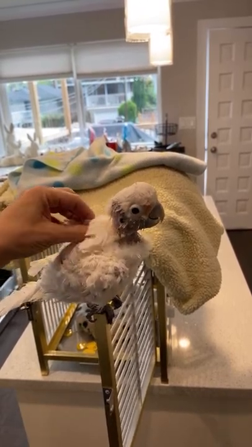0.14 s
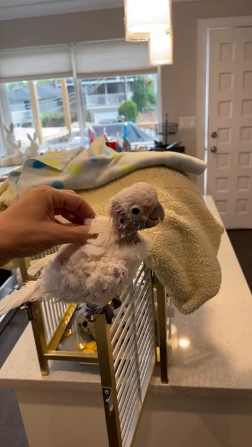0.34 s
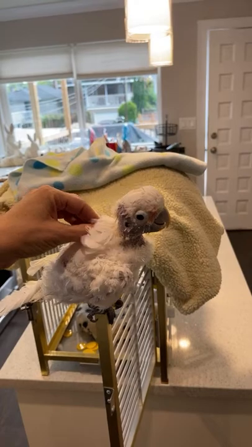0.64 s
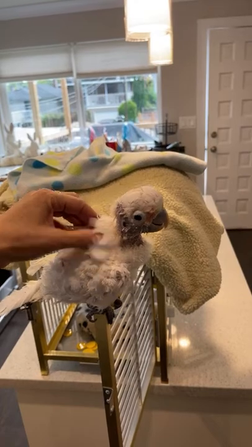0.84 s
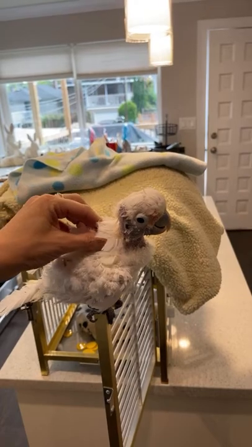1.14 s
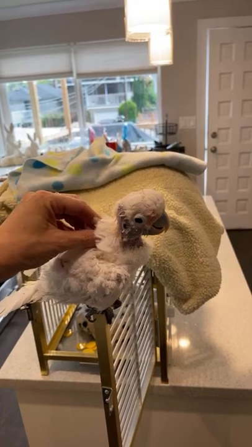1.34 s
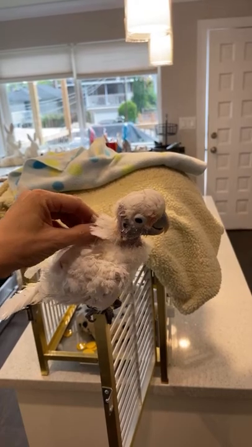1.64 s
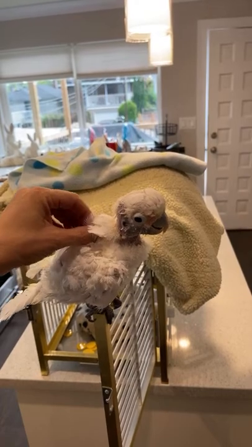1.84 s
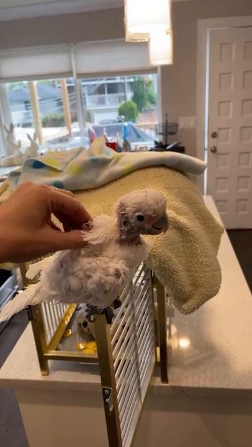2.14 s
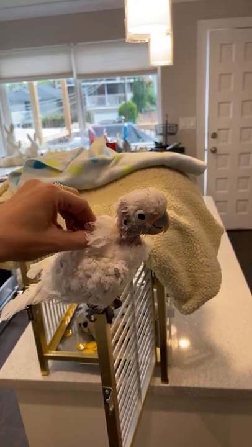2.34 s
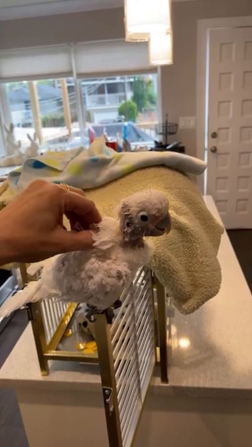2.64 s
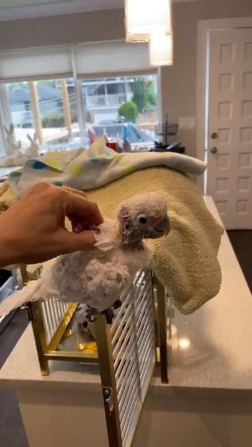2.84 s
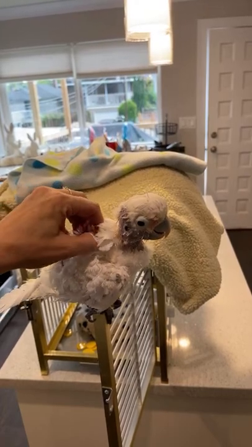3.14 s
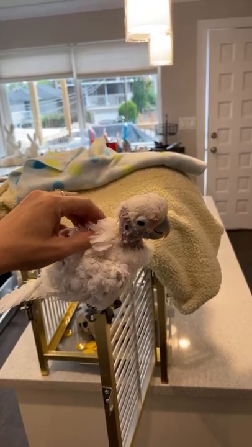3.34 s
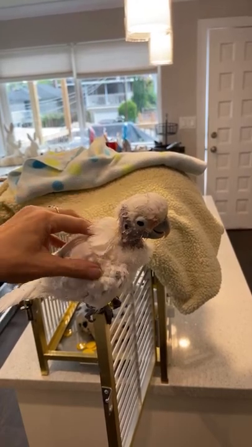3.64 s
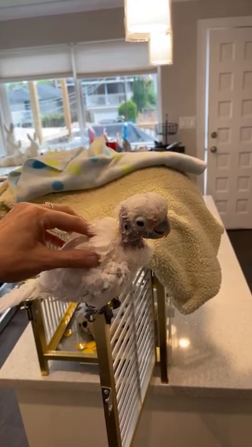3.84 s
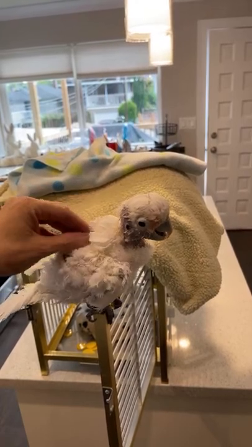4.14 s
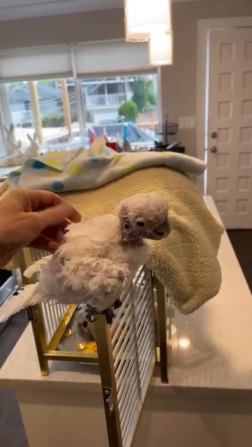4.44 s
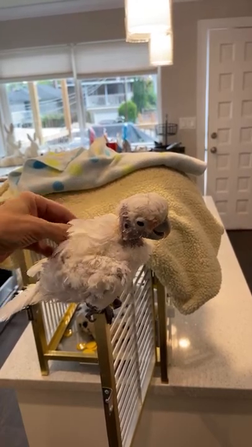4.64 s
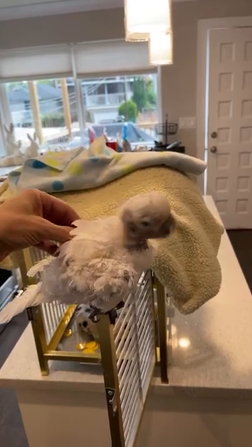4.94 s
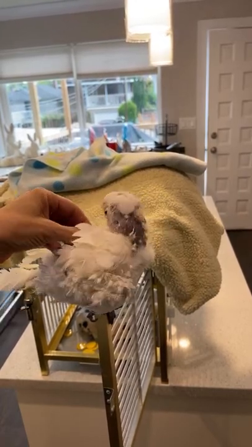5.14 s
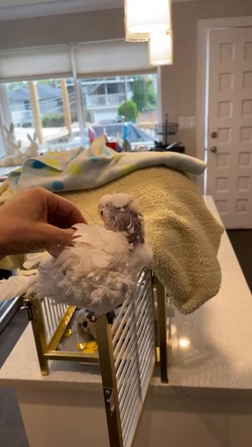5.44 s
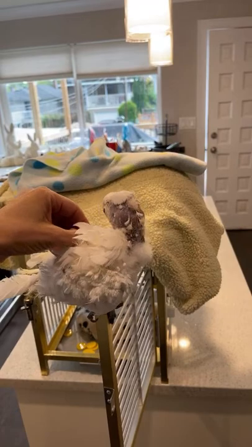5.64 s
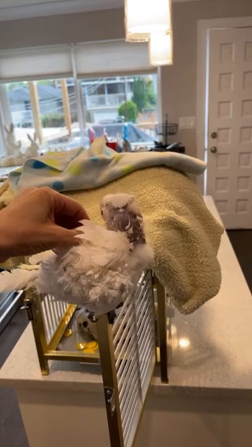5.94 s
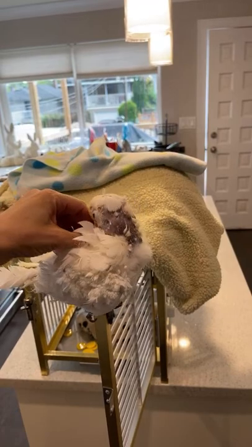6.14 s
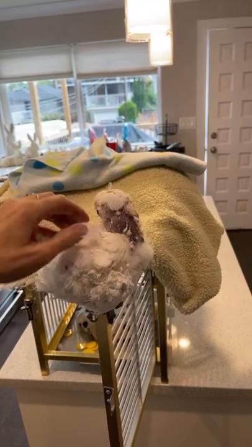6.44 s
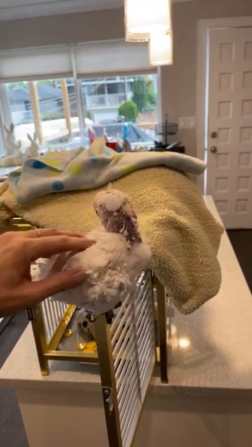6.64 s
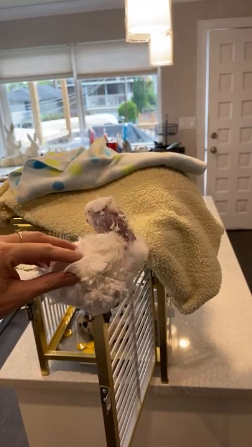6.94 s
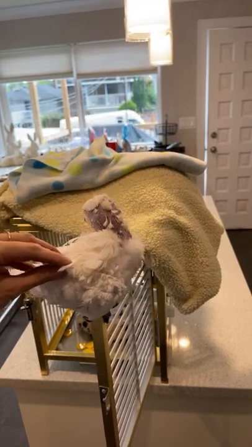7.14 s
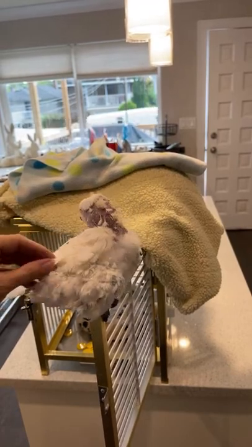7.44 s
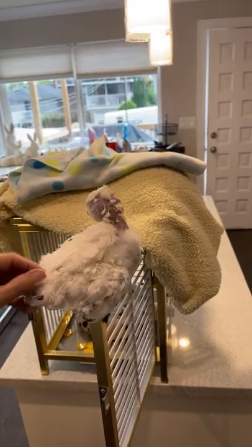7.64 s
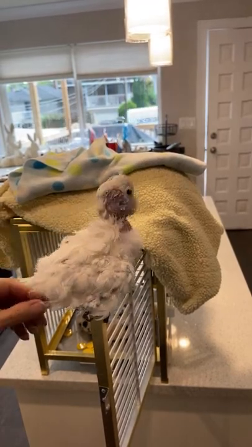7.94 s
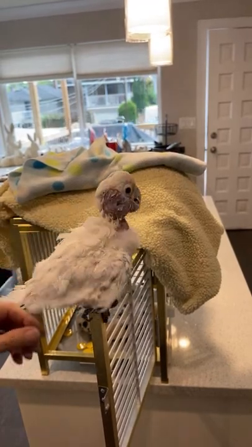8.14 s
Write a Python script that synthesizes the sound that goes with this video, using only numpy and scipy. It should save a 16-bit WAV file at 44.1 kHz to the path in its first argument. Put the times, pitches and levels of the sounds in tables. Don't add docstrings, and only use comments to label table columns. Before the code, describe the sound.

A parrot calls in a lively, hard-walled room; the echo is stronger than the direct sound, and low motor rumble, airy hiss and faint steady hum continue throughout. At 0 s the tail of a short whistle meets a raspy squawk. A barely audible distant cheep comes at 0.6 s, and the rumble briefly surges around 1 s. Two harsh squawks follow at 1.1-1.4 s, then a squawk with a shrill whistle at 1.55 s. At 1.9 s a hoot rises, hoarse then clear, for a third of a second. A pause holds only hum and a very faint brush at 2.8 s. Squawk pairs sound at 3.3, 3.9 and 4.9 s, with high whistles at 3.55-3.8 s; a squawk and long piercing whistle come at 5.5 s. A second rising hoot at 5.8 s, whistles at 6.6-6.9 s, and last squawks at 7-7.3 s. Dry feathers softly crackle at 7.7-8.2 s.

```python
import sys
import numpy as np
from scipy import signal
from scipy.fft import rfft, irfft, next_fast_len
from scipy.io import wavfile
from scipy.ndimage import uniform_filter1d, map_coordinates

SR = 44100
rng = np.random.default_rng(int(sys.argv[2]) if len(sys.argv) > 2 else 0)


def nominal_scale(level):
    x = np.asarray(level, float) / 20
    return 10 ** x


def transcribe(u):
    v = np.clip(np.atleast_2d(u).T, -1, 1)
    q = np.round(v * 32767).astype(np.int16)
    wavfile.write(sys.argv[1], SR, q)


N = 365443
T = np.arange(N) / SR

# [hz, level_db]
HUM_TONES = [(592.2, -75.5), (662.1, -62.5), (775.2, -61.5), (1184, -67), (1265, -68), (3553, -74)]
# [hz, db_per_hz]
MOTOR_SPECTRUM = [(18, -55), (30, -36), (92, 3), (208, -17)]
# [hz, db_per_hz]
AIR_SPECTRUM = [(140, -7), (208, -12), (620, -15.5), (1770, -25.5), (3600, -32.5), (6200, -44.5),
                (7500, -53.5), (15600, -69.5)]
# [start_s, length_s, level_db, pitch_hz, roughness_0_1]
SQUAWKS = [(-.1, 0.12, -43, 485, 0.89), (.055, 0.19, -23.5, 499.4, 0.86), (1.062, 0.21, -21, 500, 0.97),
           (1.25, 0.14, -21, 530, 0.8), (1.535, 0.11, -27.5, 447.2, 0.85),
           (3.325, 0.17, -20.5, 519.3, 0.89), (3.495, .15, -20.5, 540, .75), (3.9, 0.16, -22.5, 500, 0.71),
           (4.075, 0.15, -23.5, 514.5, .4), (4.94, .21, -21, 522, 0.72), (5.145, 0.1, -19.5, 526.7, 0.38),
           (5.455, 0.13, -19, 500, 0.72), (7.012, 0.14, -19, 480.8, 0.91), (7.195, 0.12, -20.5, 500, .3)]
# [centre_hz, width_hz, level_db]
SQUAWK_THROAT = [
    [(946, 220, -15), (1204, 440, -1.5), (1543, 3000, -5), (2400, 400, -2.5), (3055, 510, -1)],
    [(3590, 2400, 6), (4570, 560, 14.5), (5200, 320, -8)],
    [(5866, 1100, 6), (7260, 800, -15.5), (8150, 460, 1), (9600, 1200, -14), (12000, 6000, -10.5),
     (13300, 1100, -21.5), (16000, 1100, -15)],
]
# [centre_hz, width_hz, level_db]
CROP_MODES = [(740, 260, 0)]
# [start_s, length_s, level_db, pitch_hz, octave_db]
OPENING_WHISTLE = [
    (-0.012, 0.047, -18, 1905, -32),
]
# [start_s, length_s, level_db, pitch_hz, octave_db]
HIGH_WHISTLES = [
    (1.555, 0.15, -16.5, 3400, -26.5),
    (3.55, 0.14, -22, 3528, -15),
    (3.67, .08, -22, 3788, -30),
    (3.73, 0.078, -23.5, 3204, -19),
    (5.54, .18, -17.5, 3447, -23),
    (6.62, .165, -18.5, 3407, -18.5),
    (6.81, .1, -32, 3163, -24.5),
]
# [start_s, length_s, level_db, pitch_hz, octave_db]
LOW_WHISTLES = [
    (1.515, 0.13, -27.5, 2270, -7),
    (6.585, .13, -32.5, 2376, -4),
    (6.81, 0.057, -39.5, 2400, -6.5),
]
# [start_s, length_s, level_db, pitch_hz]
CHEEPS = [
    (.59, .4, -75, 3070),
    (2.55, 0.19, -77.5, 8260),
]
# [time_s, pitch_hz, level_db, beak_opening_db]
HOOTS = [
    [(1.865, 343.5, -41.5, -15), (1.905, 372.1, -21.5, -20), (1.97, 441.6, -20.5, -1),
     (2.046, 484.6, -18.5, 5.5), (2.09, 514.3, -16.5, -11.5), (2.14, 507.1, -19.5, -3.5),
     (2.2, 513.2, -26.5, -1)],
    [(5.775, 348, -42, -35), (5.82, 392.5, -24, -21), (5.87, 422.8, -22, -6), (5.93, 457.2, -20, 1),
     (6.02, 488.6, -20.5, -4.5), (6.075, 497.4, -19.5, -5), (6.115, 509, -36, -6.5)],
]
# [centre_hz, width_hz, level_db]
HOOT_THROAT = [
    [(400, 350, -20), (1000, 550, -7), (1450, 600, 0)],
    [(2450, 500, -13), (2950, 450, -7), (3450, 550, 0), (4300, 800, -1), (4800, 450, -5)],
    [(7050, 600, 0), (8700, 600, -4), (10700, 900, -2), (12800, 700, -7), (14600, 700, -15)],
]
# [hz, t60_s]
ROOM_DECAY = [(400, .4), (1500, .45), (4000, .42), (9000, .35), (15000, .25)]
# [middle_s, half_width_s, level_db]
FEATHER_STROKES = [
    (2.78, 0.11, -80),
    (7.768, .06, -66),
    (7.94, .025, -57),
    (8.02, .05, -70),
    (8.135, .012, -72),
    (8.185, 0.0112, -76),
]
# [hz, db_per_hz]
FEATHER_SPECTRUM = [(880, -41), (1500, -11), (1670, -20), (1820, 2.5), (4230, 5.5), (4760, 7.5),
                    (15600, -7.5)]

SQUAWK_SHAPE = dict(attack_s=.085, rise_db=40, swell_db=5, fade_db=250, scoop=.2, glide_s=.07, sag=.01)
OPENING_SHAPE = dict(attack_s=.012, rise_db=30.5, swell_db=-27, fade_db=172, scoop=0, glide_s=.03, sag=.023)
CHEEP_SHAPE = dict(attack_s=.02, rise_db=15, swell_db=5, fade_db=500, scoop=0, glide_s=.03, sag=0)
HIGH_SHAPE = dict(attack_s=.045, rise_db=25, swell_db=-8, fade_db=400, scoop=.08, glide_s=.03, sag=.75)
LOW_SHAPE = dict(attack_s=.03, rise_db=30, swell_db=-80, fade_db=400, scoop=.25, glide_s=.022, sag=.01)


def unit(x):
    return x / np.sqrt(np.mean(x ** 2) + 1e-20)


def along(points, hz):
    f, v = np.transpose(points)
    return np.interp(np.log(hz + 1), np.log(f + 1), v)


def wobble(rate_hz):
    t = T[::3]
    knots = rng.standard_normal(int(N * rate_hz / SR) + 4)
    return np.interp(T, t, map_coordinates(knots, [t * rate_hz]))


def filtered(x, response):
    m = next_fast_len(N + 8192)
    return irfft(rfft(x, m) * response(np.fft.rfftfreq(m, 1 / SR)), m)[:N]


def house():
    surge_db = 7.5 * np.exp(-((T - 1.03) / .083) ** 2)
    rumble_db = -56.5 + .8 * wobble(1.1) + surge_db
    rumble = filtered(rng.standard_normal(N), lambda f: nominal_scale(along(MOTOR_SPECTRUM, f)) * (f < 140))
    air = filtered(rng.standard_normal(N), lambda f: nominal_scale(along(AIR_SPECTRUM, f)) * (f >= 140))
    air = unit(air) * nominal_scale(.7 * wobble(6))
    tones = np.zeros(N)
    for hz, level_db in HUM_TONES:
        tones += nominal_scale(level_db + 2.5 * wobble(4)) * np.sin(2 * np.pi * hz * T + .7 * wobble(12))
    hiss = nominal_scale(-94.5) * rng.standard_normal(N)
    return nominal_scale(rumble_db) * unit(rumble) + nominal_scale(-54.5) * air + nominal_scale(-1.5) * tones + hiss


def note_curves(rows, attack_s, rise_db, swell_db, fade_db, scoop, glide_s, sag):
    breath_gap_s = .1
    start, length, level_db, hz, *more = np.transpose(rows)
    t = T[::40]
    age = t - start[:, None]
    effort_db = -rise_db * np.clip(1 - age / attack_s, 0, 3) ** 2
    effort_db = effort_db - fade_db * np.maximum(age - length[:, None], 0)
    held_s = np.clip(age, 0, length[:, None]) - length[:, None] / 2
    gain = nominal_scale(level_db[:, None] + effort_db + swell_db * held_s)
    now = np.argmax(gain, axis=0)
    fresh = np.append(True, start[1:] - (start + length)[:-1] > breath_gap_s)
    breath_start = np.maximum.accumulate(np.where(fresh, start, -1))
    since_s = np.maximum(t - breath_start[now], 0)
    sag_share = sag * np.clip(t - start[now], 0, length[now])
    pitch = hz[now] * (1 - scoop * np.exp(-since_s / glide_s) - sag_share)
    smooth = [uniform_filter1d(v, size=15) for v in [pitch] + [c[now] for c in more]]
    return [np.interp(T, t, v) for v in [gain.sum(0), effort_db.max(0)] + smooth]


def resonant(x, modes):
    low_hz, high_hz = .75 * modes[0][0], 1.15 * modes[-1][0]

    def response(f):
        power = 0
        for centre, width, db in modes:
            peak = (f * width) ** 2 / ((centre ** 2 - f * f) ** 2 + (f * width) ** 2)
            power = power + (nominal_scale(db) * peak) ** 2
        return np.sqrt(power) / (1 + (low_hz / (f + 1)) ** 4) / (1 + (f / high_hz) ** 4)

    return unit(filtered(x, response))


def mottled(x, depth_db):
    z = signal.stft(x, nperseg=512)[2]
    field = uniform_filter1d(rng.standard_normal(z.shape), size=5, axis=0)
    field = uniform_filter1d(field, size=10, axis=1)
    return unit(signal.istft(z * nominal_scale(depth_db * unit(field)), nperseg=512)[1][:N])


def pulsed(gain, hz, rough, crop_db, ridge_db, beak_db, top_db, throat, jitter, breath, restless_db):
    count = 32
    steady = 2 * np.pi * np.cumsum(hz * (1 + (.004 + .075 * rough ** 2) * wobble(110))) / SR
    phase = steady + 2 * np.pi * np.cumsum(hz * jitter * rough ** 2 * wobble(130)) / SR
    slaps = unit(np.sin((count - .5) * phase) / (2 * np.sin(phase / 2) + 1e-9) - .5)
    slaps = slaps * nominal_scale(5 * rough * wobble(150))
    air = unit(rng.standard_normal(N) * (1 + np.cos(phase)))
    air_share = np.clip(breath * rough, 0, 1)
    source = mottled(np.sqrt(1 - air_share) * slaps + np.sqrt(air_share) * air, restless_db)
    chest, beak, top = (resonant(source, modes) for modes in throat)
    crop = resonant(source, CROP_MODES)
    ridge = np.sin(4 * steady) * nominal_scale(7 * rough * wobble(110))
    ridge_db = ridge_db - 6 * ((4 * hz - 2080) / 320) ** 2
    voice = chest + nominal_scale(crop_db) * crop + nominal_scale(ridge_db) * ridge + nominal_scale(beak_db) * beak
    return gain * (voice + nominal_scale(top_db) * mottled(top, restless_db))


def squawks():
    gain, effort_db, hz, rough = note_curves(SQUAWKS, **SQUAWK_SHAPE)
    ridge_grows, top_grows, weak_rough = .75, .61, .7
    ridge_db = 1.8 + ridge_grows * effort_db
    beak_db = -8.5 + top_grows * effort_db
    top_db = -17 + 12.5 * (1 - rough) + top_grows * effort_db
    crop_db = -11.5 - 1 * np.maximum(hz - 433.6, 0)
    rough = rough + weak_rough * (1 - rough) * (1 - nominal_scale(effort_db))
    return pulsed(gain, hz, rough, crop_db, ridge_db, beak_db, top_db, SQUAWK_THROAT,
                  jitter=.18, breath=.45, restless_db=2.5)


def whistle(calls, shape, flutter, halo_db, upper_db):
    gain, _, hz, octave_db = note_curves(calls, **shape)
    phase = 2 * np.pi * np.cumsum(hz * (1 + flutter * wobble(180))) / SR
    tone = np.sin(phase) + nominal_scale(octave_db) * np.sin(2 * phase)
    upper = np.sin(3 * phase) + .18 * np.sin(4 * phase) + .38 * np.sin(5 * phase)
    halo = wobble(1300) + .13 * wobble(4000)
    swell = nominal_scale(3.2 * wobble(90)) + nominal_scale(halo_db) * halo
    return np.sqrt(2) * gain * (tone + nominal_scale(upper_db) * upper) * swell


def cheeps():
    gain, _, hz = note_curves(CHEEPS, **CHEEP_SHAPE)
    hz = hz * (1 + .015 * wobble(150))
    return gain * nominal_scale(4 * wobble(40)) * np.sin(2 * np.pi * np.cumsum(hz) / SR)


def hoot_curves(rise_s=.015, fall_s=.03):
    time_s, *columns = np.transpose(np.concatenate(HOOTS))
    gate = np.zeros(N)
    for call in HOOTS:
        start, end = call[0][0], call[-1][0]
        gate += np.interp(T, [start - rise_s, start, end, end + fall_s], [0, 1, 1, 0])
    return [gate] + [np.interp(T, time_s, c) for c in columns]


def hoots():
    gate, hz, level_db, open_db = hoot_curves()
    starts = np.array([call[0][0] for call in HOOTS])
    nearest = np.argmin(abs(T - starts[:, None]), axis=0)
    age_s = np.maximum(T - starts[nearest], 0)
    start_rough, held_rough, settle_s = .8, .12, .045
    rough = held_rough + (start_rough - held_rough) * np.exp(-(age_s / settle_s) ** 2 / 2)
    rough = np.clip(rough + 3 * np.maximum(age_s - .22, 0), 0, 1)
    crop_db = -33.5 * (1 - np.exp(-(age_s / .023) ** 2 / 2))
    top_db = -20.5 + .45 * open_db
    return pulsed(gate * nominal_scale(level_db), hz, rough, crop_db, 6, open_db, top_db, HOOT_THROAT,
                  jitter=.2, breath=.3, restless_db=1.5)


def parrot():
    opening = whistle(OPENING_WHISTLE, OPENING_SHAPE, flutter=.0094, halo_db=-53, upper_db=-42)
    high = whistle(HIGH_WHISTLES, HIGH_SHAPE, flutter=.03, halo_db=-11, upper_db=-37)
    low = whistle(LOW_WHISTLES, LOW_SHAPE, flutter=.04, halo_db=-11, upper_db=-25.5)
    return squawks() + opening + high + low + hoots()


def room(x, wet_db, direct_db):
    hz, t, z = signal.stft(rng.standard_normal(SR), SR, nperseg=256)
    decay = nominal_scale(-60 * t / along(ROOM_DECAY, hz)[:, None])
    tail = signal.istft(z * decay, SR, nperseg=256)[1]
    tail = np.pad(tail / np.linalg.norm(tail), (130, 0))
    return nominal_scale(direct_db) * x + nominal_scale(wet_db) * signal.fftconvolve(x, tail)[:N]


def ruffle():
    strokes = np.zeros(N)
    for middle_s, half_width_s, level_db in FEATHER_STROKES:
        strokes += nominal_scale(level_db) * np.exp(-((T - middle_s) / half_width_s) ** 2 / 2)
    grains = rng.standard_normal(N) * nominal_scale(3 * wobble(400))
    return strokes * unit(filtered(grains, lambda f: nominal_scale(along(FEATHER_SPECTRUM, f))))


def scene():
    bird = room(parrot(), wet_db=-2.5, direct_db=-4)
    return (house() + bird + cheeps() + ruffle())[None]


def top_cut(x):
    return signal.sosfilt(signal.butter(12, 15710, fs=SR, output="sos"), x)


def record(dry):
    soft = dry / (1 + np.abs(dry / .9) ** 6) ** (1 / 6)
    return top_cut(soft)


dry = scene()
out = record(dry)
transcribe(out)
```